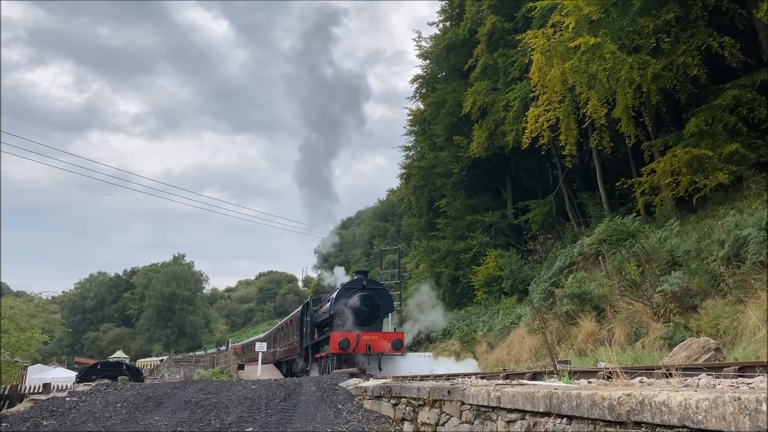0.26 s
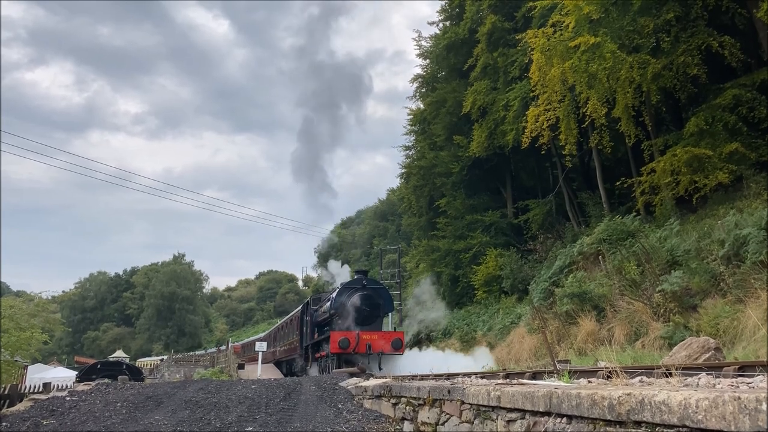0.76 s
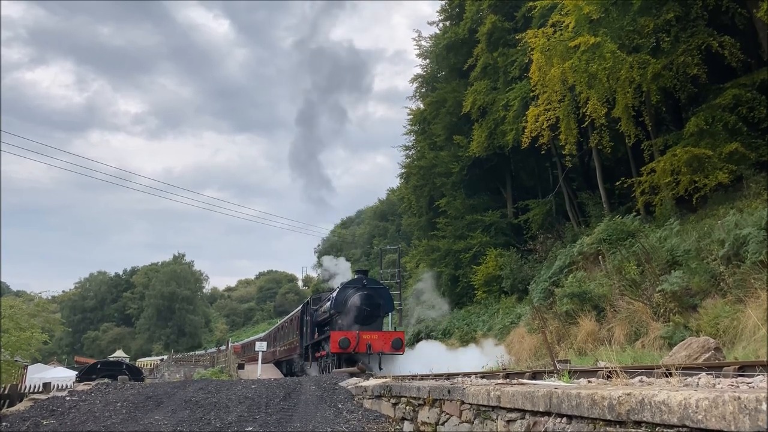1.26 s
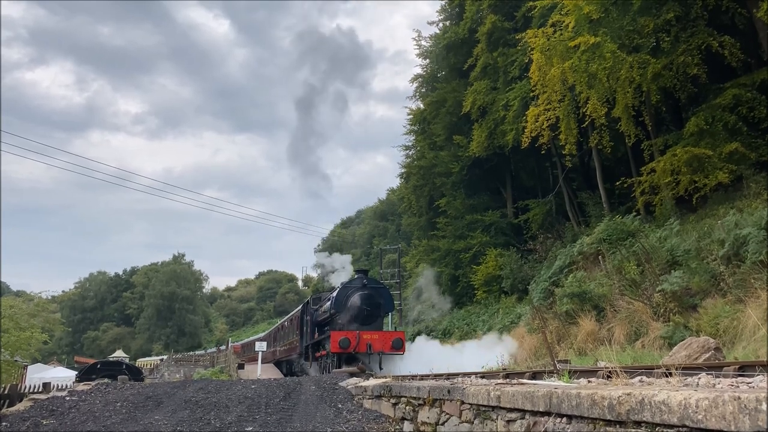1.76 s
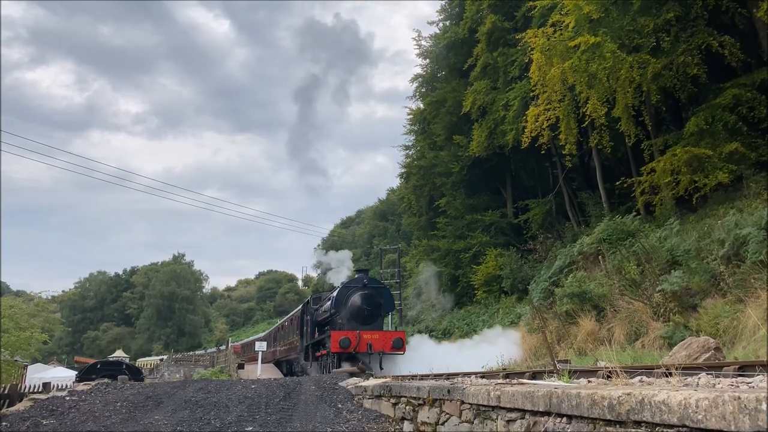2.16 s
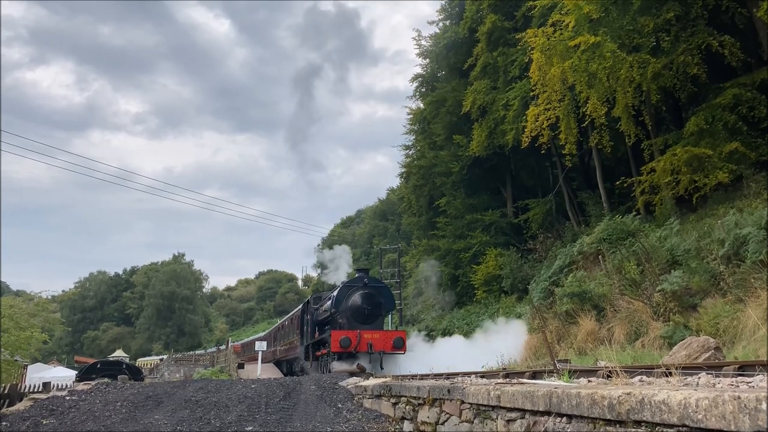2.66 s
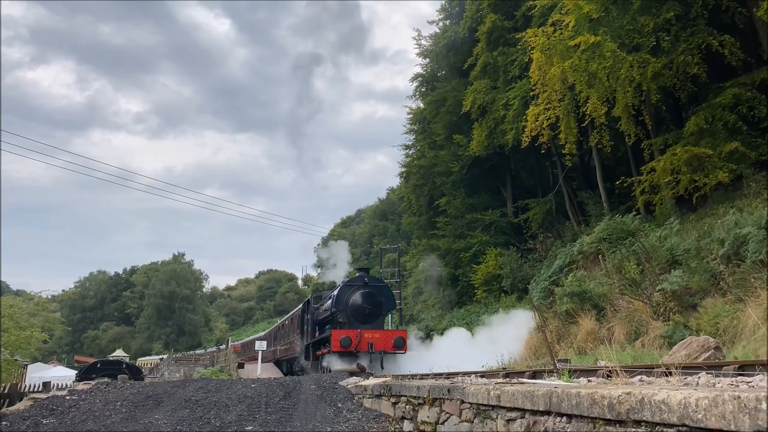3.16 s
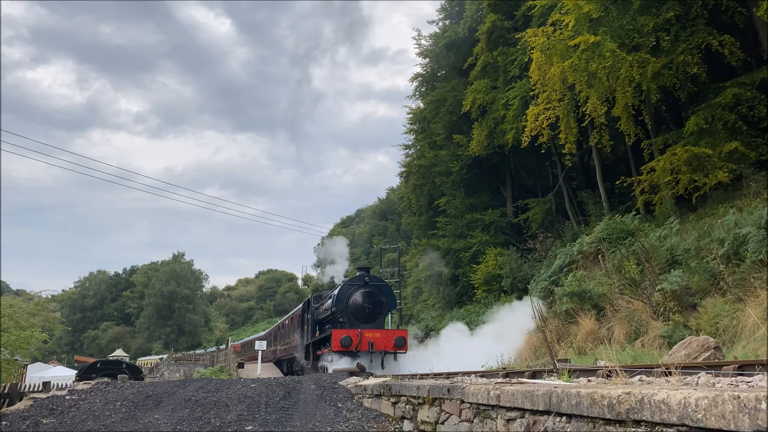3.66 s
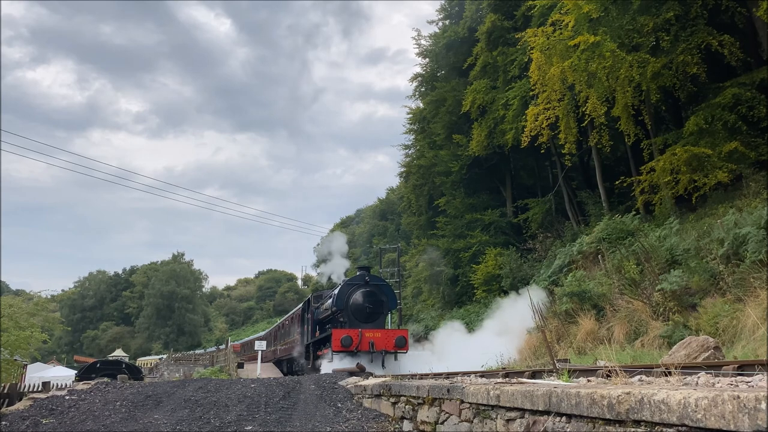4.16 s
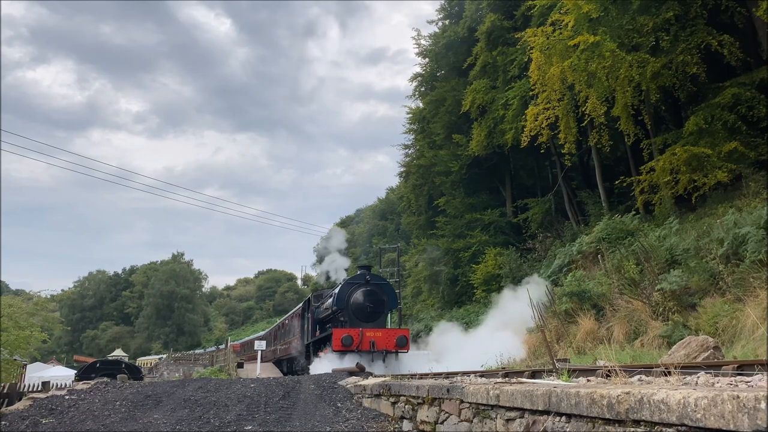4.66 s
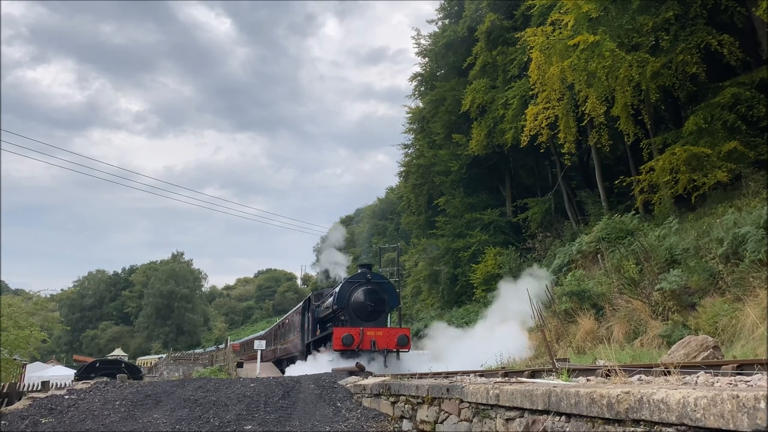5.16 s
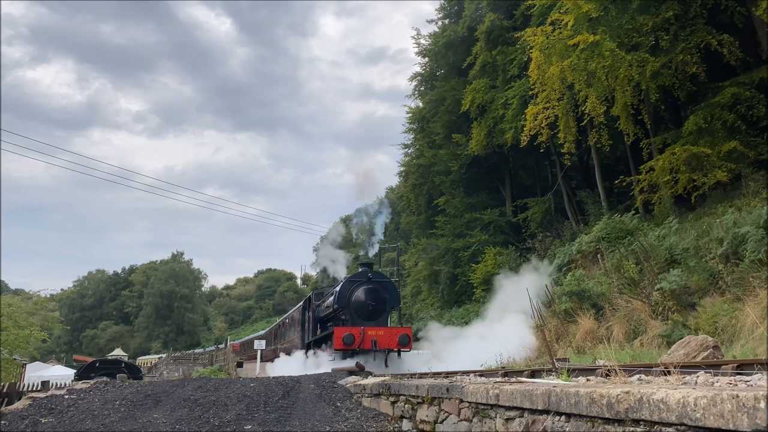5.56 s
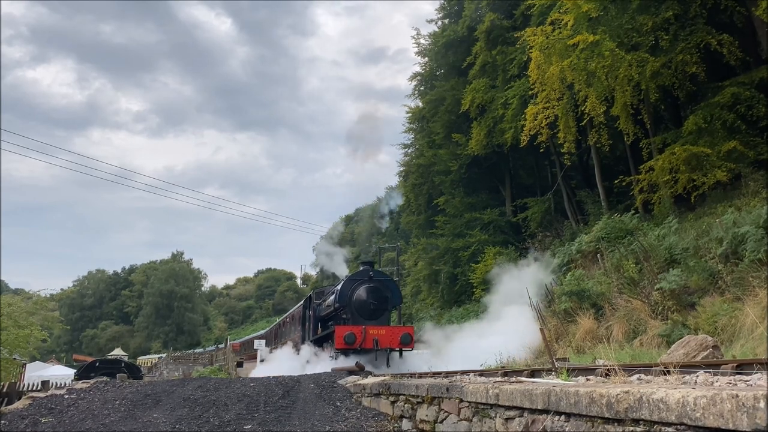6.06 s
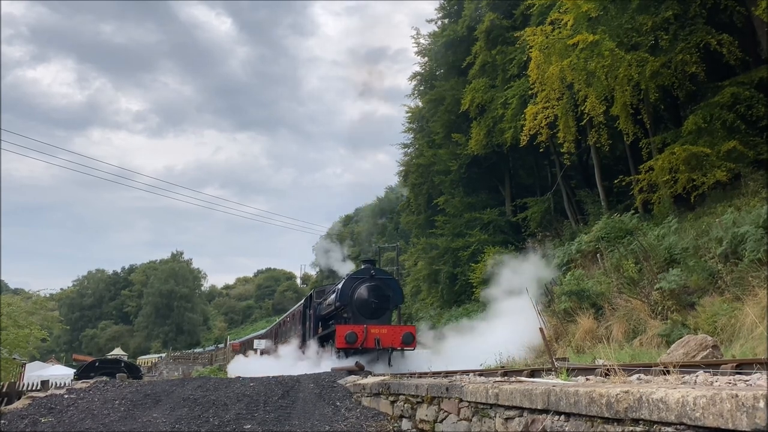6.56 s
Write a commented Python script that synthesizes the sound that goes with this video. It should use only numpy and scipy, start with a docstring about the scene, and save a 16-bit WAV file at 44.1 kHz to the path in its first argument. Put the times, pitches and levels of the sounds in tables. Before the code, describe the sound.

A steam locomotive hisses loudly from its cylinder cocks, the jet sinking and swelling again, with a soft exhaust thump over a low chimney rumble.

```python
"""Station in a wooded valley: a steam locomotive creeps out with its cylinder drain cocks open.
Steam jets (coloured noise) hiss loudly, sink and swell again.
A hollow note near 1 kHz (noise through narrow modes) sings in the steam, with thin strands and whistles.
The chimney rumbles and hums underneath and gives one soft exhaust beat of noise puffs and a sagging thud.
Heard in wide, uneven stereo."""
import sys
import numpy as np
from scipy import signal
from scipy.fft import irfft
from scipy.io import wavfile
from scipy.ndimage import uniform_filter1d

SR = 44100
rng = np.random.default_rng(int(sys.argv[2]) if len(sys.argv) > 2 else 0)


def transcribe(signal):
    """Save signal, clipped to [-1, 1], as a 16-bit WAV file at the path in sys.argv[1]."""
    frames = np.atleast_2d(signal).T
    limited = np.clip(frames, -1, 1)
    pcm = np.round(limited * 32767).astype(np.int16)
    wavfile.write(sys.argv[1], SR, pcm)


N = 300762
FRAME, HOP = 1024, 256  # samples
HZ = np.fft.rfftfreq(FRAME, 1 / SR)
FINE_HZ = np.fft.rfftfreq(N, 1 / SR)
TIMES = np.arange(N // HOP + 5) * HOP / SR  # s, one per frame
T = np.arange(N) / SR  # s, one per sample

# steam flow through the drain cocks, as a relative hiss level: t/s, level/dB
FLOW = [(0.0, -22.5), (0.1, -22.5), (0.23, -24), (0.34, -23), (0.82, -25), (1.39, -26.5), (1.85, -31),
        (1.99, -30.5), (2.55, -35.5), (2.72, -34.5), (3.15, -33), (3.87, -32), (4.2, -29.5), (4.69, -26),
        (4.9, -23.5), (5.14, -24.5), (5.35, -26.5), (5.6, -25), (5.8, -28), (5.95, -28), (6.15, -32),
        (6.55, -34.5), (6.73, -33), (6.82, -33)]


def drain_cocks(level_db=4.5, patchy_db=0.77, flutter_db=0.35, spit_db=0.9, churn_db=2.0, ripple_db=1.65):
    """Jets of steam: a roaring plume, a hissing core and a fizz at the nozzles."""
    # jet spectrum: f/Hz, relative level/dB
    jet_colour = [(300, -8.5), (550, -10.5), (660, -5.5), (900, -6.5), (1500, -5), (2800, -1.13),
                  (4600, -.5), (6200, -1.16), (7300, -4.5), (8000, -7), (9200, -6), (12000, -7.5),
                  (14000, -5), (15500, -11.5)]
    roar_growth, fizz_growth = 0.46, 0.97  # dB per dB of flow
    hiss_db, = follow(FLOW, TIMES[:, None])
    roar_db, fizz_db = stroke_state(TIMES[:, None])
    # a weak jet is dull, a strong one bright: roar and fizz relative to the hiss
    roar_db = roar_db + (roar_growth - 1) * hiss_db
    fizz_db = fizz_db + (fizz_growth - 1) * hiss_db
    fizz_db = fizz_db + spit_db * patches(size=(14, 1))[:, :1]  # wet steam spits unevenly

    low_cut = FINE_HZ ** 2 / (FINE_HZ ** 2 + 130 ** 2)  # a jet has little bass
    steam = handed_over(gain_of(read(jet_colour, FINE_HZ)) * low_cut)

    # (Hz, share) points
    roar_share = read([(400, 1.55), (1500, 1.03), (2300, 1.05), (2900, 0.66), (4500, 0.34), (7000, 0.086)])
    fizz_share = read([(6500, 0.088), (9000, 0.28), (13500, 1.07)])
    churn_share = read([(250, 0.3), (450, 1), (900, .8), (2000, 0.69), (4000, 0.48), (7000, 0.11)])
    ripple_share = read([(500, 0.87), (2000, 0.93)])
    field_db = hiss_db + roar_share * (roar_db - roar_db.mean())
    field_db = field_db + fizz_share * (fizz_db - fizz_db.mean())
    # eddies make the jet flutter, in narrow patches and across wide bands
    field_db = field_db + patchy_db * patches(size=(4, 14)) + flutter_db * patches(size=(4, 300))
    # the plume's large eddies churn its low roar more coarsely
    field_db = field_db + churn_db * patches(size=(7, 3)) * churn_share
    # echoes off the ground and the frames ripple the spectrum, drifting as the engine moves
    field_db = field_db + ripple_db * patches(size=(16, 1)) * ripple_share

    z = signal.stft(steam, nperseg=FRAME, noverlap=FRAME - HOP)[2]
    z = z * gain_of(field_db[:z.shape[-1]].T)
    jets = signal.istft(z, nperseg=FRAME, noverlap=FRAME - HOP)[1][:, :N]
    flow_rms = np.sqrt(np.mean(gain_of(hiss_db) ** 2))
    return gain_of(level_db) * flow_rms * evened(jets)


def handed_over(colour):
    """The hiss passes gradually through three jet colours, each with its own resonances."""
    # jet resonances and hollows: f/Hz, width/Hz, first jet/dB, second jet/dB, third jet/dB
    jet_peaks = [(367, 120, 1, 0, 0), (560, 120, -0.5, 0.5, -0.5), (1170, 55, -0.5, 3.5, -0.5),
                 (1370, 130, 1.5, 2.5, -1.5), (1550, 99, 0, -1.5, -0.5), (1748, 120, 4, 3.5, 1),
                 (2000, 130, 1, -2, 0), (2200, 220, 2, 2.5, 1), (2480, 150, 1.5, 1.5, 4),
                 (2630, 140, 0, -3, -1), (3070, 330, -1, 0, .5), (3470, 250, 1.5, 2.5, 3),
                 (3740, 160, -1.5, -1.5, -1.5), (4140, 140, 3.5, -0.5, 1), (4940, 550, 0, 1.5, 1.5),
                 (5560, 240, 2, 0, 0), (5900, 300, 0, 2, 1.5), (9200, 280, 0, 0.5, 2)]
    starts_s, length_s = [1.99, 4.52], 1.16
    hz, width_hz, *jets_db = np.transpose(jet_peaks)
    jets = []
    for db in jets_db:
        resonances = gain_of(peaks(zip(hz, width_hz, db)))
        jets.append(turbulence(colour * resonances * echo_ripple(depth_db=1.33, size=50)))
    steam, *later = jets
    for start_s, jet in zip(starts_s, later):
        share = np.clip((T - start_s) / length_s, 0, 1)
        steam = np.sqrt(1 - share) * steam + np.sqrt(share) * jet
    return steam


def stroke_state(t):
    """Each stroke sets the roar and fizz (dB) as its valve opens; then roar drifts and the steam dries."""
    # piston strokes, each uncovering a cock with fresh water in it, levels relative:
    # start/s, roar/dB, roar growth/(dB/s), fizz/dB, drying/(dB/s)
    strokes = [(-0.1, -0.93, 0, -0.2, 1.1), (2.75, 1, -0.2, 1, 0.27), (5.8, 0.2, 0.6, 4.5, 0.5)]
    valve_s = 0.25  # opening time
    state = None
    for start_s, roar_db, growth, fizz_db, drying in strokes:
        age_s = np.maximum(t - start_s, 0)
        fresh = np.array([roar_db + growth * age_s, fizz_db - drying * age_s])
        if state is None:
            state = fresh
        else:
            state = state + (fresh - state) * np.minimum(age_s / valve_s, 1)
    return state


def echo_ripple(depth_db, size):
    """Many late echoes off the wooded slope comb a spectrum finely."""
    return gain_of(depth_db * evened(uniform_filter1d(rng.standard_normal(len(FINE_HZ)), size)))


def pipe_note():
    """Rushing steam excites close pipe modes, a breathy note that swells and sinks, and steadier modes around."""
    # pipework modes of the note: f/Hz, width/Hz, relative level/dB
    pipe_modes = [(981.4, 21.5, -3.5), (1004, 25, -1), (1041, 30, -0.5), (1071, 32, -1)]
    # weaker breathy modes around the note: f/Hz, width/Hz, relative level/dB
    side_modes = [(680, 84, -11.5), (1330, 34, -6), (1327, 160, -12), (1736, 61, -6.5), (1834, 58, -5),
                  (2238, 95, -4), (2370, 87, -11.5)]
    # swells and lulls of the note: middle/s, half length/s (to 1/e), change/dB
    pipe_swells = [(.115, 0.04, 3), (.2, 0.039, -3), (1.52, 0.43, -4.5), (2.0, .05, 2), (2.14, .03, 3),
                   (2.454, 0.023, 6), (2.65, 0.083, -7), (3.02, 0.06, 2.5), (3.622, 0.051, 3.5),
                   (4.016, .06, 4), (4.2, 0.11, -8), (6.72, 0.072, -7)]
    level_db, fade_db_per_s, waver_db = -39.5, 0.45, 0.7
    side_db, side_fade_db_per_s, side_waver_db = -41, 0.2, 1
    swells_db = sum(db * np.exp(-((T - s) / half_s) ** 2) for s, half_s, db in pipe_swells)
    note_db = level_db - fade_db_per_s * T + swells_db + waver_db * drift(size=14)
    note = wavering(steadied(ringing(pipe_modes), size=3000), depth=0.00899)
    around_db = side_db - side_fade_db_per_s * T + side_waver_db * drift(size=12)
    around = wavering(ringing(side_modes), depth=0.00605)
    return gain_of(note_db) * note + gain_of(around_db) * around


def strands(waver_db=2):
    """Thin ringing strands (narrow noise) come and go in the hiss, stronger when much steam flows."""
    # strands: f/Hz, relative level/dB
    strand_modes = [(1858, -3), (2240, -5), (2369, -1.5), (2480, -1), (2880, -4), (4091, -8), (4620, 0.5),
                    (5972, -3), (6490, -6)]
    mean_db, width_hz, growth = -42.5, 10, 0.8  # growth: dB per dB of flow
    flow_db, = follow(FLOW, T)
    level_db = mean_db + growth * (flow_db - flow_db.mean()) + waver_db * drift(size=40)
    ring = ringing([(hz, width_hz, db) for hz, db in strand_modes])
    return gain_of(level_db) * wavering(ring, depth=0.00151)


def whistles(waver=0.0038):
    """Now and then a jet locks into a faint gliding tone: a sine of slightly unsteady pitch."""
    # whistles in jets and pipework: start/s, length/s, start f/Hz, end f/Hz, peak rms level/dB
    whistle_rows = [(0.065, 0.093, 1020, 1080, -41), (0.11, 0.058, 847, 834, -40.5),
                    (0.196, 0.105, 815, 708, -42), (0.288, 0.089, 6170, 6300, -30),
                    (0.37, 0.1, 2210, 2250, -36), (0.663, 0.055, 690, 666, -46.5),
                    (2.277, .075, 1020, 1068, -37.5), (2.339, 0.049, 1030, 973, -38),
                    (2.428, 0.049, 988, 1016, -37), (2.99, 0.055, 982, 1020, -42)]
    bend, late = 1.4, 1.7  # glide steepens; loudest about two thirds through
    out = np.zeros(N)
    for s, length_s, start_hz, end_hz, db in whistle_rows:
        u = np.clip((T - s) / length_s, 0, 1)
        jitter = evened(uniform_filter1d(rng.standard_normal(N), size=150))
        hz = (start_hz + (end_hz - start_hz) * u ** bend) * (1 + waver * jitter)
        envelope = np.sqrt(2 * abs(np.sin(np.pi * u ** late)))
        out += gain_of(db) * envelope * np.sin(2 * np.pi * np.cumsum(hz) / SR)
    return out


def exhaust():
    """A cylinder empties up the chimney: a growing breath, then merging soft puffs and a deep, sagging thud."""
    # exhaust puffs: peak/s, level/dB, rise/s, fall/s, top f/Hz
    beats = [(5.195, -31.5, 0.024, 0.042, 220), (5.282, -28, 0.028, 0.024, 340),
             (5.33, -38, 0.022, 0.07, 260)]
    # puff spectrum: f/Hz, relative level/dB
    beat_colour = [(20, -34), (55, -8), (100, 2), (160, -6), (245, 1), (330, -10.5), (600, -3)]
    # breath spectrum: f/Hz, relative level/dB
    rush_colour = [(120, -20), (300, 3), (420, -0.5), (750, 6.5), (1400, -8), (3000, -27)]
    rush_s, rush_db, rush_rise_s, rush_fall_s = 5.13, -41, 0.51, 0.1
    thud_s, thud_db, thud_rise_s, thud_fall_s = 5.33, -31, 0.02, 0.022
    thud_hz, sag_hz_per_s = 67.4, 565  # pitch at thud_s
    breath = turbulence(gain_of(read(rush_colour, FINE_HZ)))
    out = gain_of(rush_db) * swell(rush_s, rush_rise_s, rush_fall_s) * breath
    for s, db, rise_s, fall_s, top_hz in beats:
        colour = gain_of(read(beat_colour, FINE_HZ)) / (1 + (FINE_HZ / top_hz) ** 4)
        out = out + gain_of(db) * puff(s, rise_s, fall_s) * steadied(turbulence(colour), size=1000)
    hz = np.clip(thud_hz - sag_hz_per_s * (T - thud_s), thud_hz / 2, thud_hz * 2)
    thud = np.sin(2 * np.pi * (np.cumsum(hz) / SR + rng.random()))
    return out + gain_of(thud_db) * puff(thud_s, thud_rise_s, thud_fall_s) * thud


def chimney(lumpy_db=1.5):
    """The draught rumbles in the chimney, deeper as it grows, and makes it hum."""
    # rumble spectrum: f/Hz, relative level/dB
    rumble_colour = [(20, -30), (35, -23), (50, -7), (70, -0.5), (105, -1), (135, -4.5), (170, -4),
                     (275, -9), (350, -19), (600, -38), (1500, -70)]
    # hollow modes of chimney and smokebox: f/Hz, width/Hz, relative level/dB
    hum_modes = [(101, 11, -11), (214, 16, -3), (232.5, 16.5, -0.5), (257, 31, -9.5)]
    # draught: t/s, rumble level/dB, hum level/dB
    draught = [(0, -45, -51.5), (1.3, -48.5, -51), (1.6, -48.5, -54), (2.3, -51, -52), (2.7, -51, -47),
               (3, -46.5, -47.5), (3.42, -45, -42), (3.7, -43, -48.5), (5, -42.5, -46), (5.5, -43.5, -45),
               (6.0, -47, -50.5), (6.5, -44.5, -46), (6.82, -46, -46.5)]
    deep_mode = (50, 24, 0)  # f/Hz, width/Hz, relative level/dB
    deep_mean_db, deep_growth = -56, 1.2  # growth: dB per dB of rumble
    rumble_db, hum_db = follow(draught, T)
    rumble = gain_of(rumble_db) * turbulence(gain_of(read(rumble_colour, FINE_HZ)))
    deep_db = deep_mean_db + deep_growth * (rumble_db - rumble_db.mean()) + lumpy_db * drift(size=16)
    deep = gain_of(deep_db) * ringing([deep_mode])
    hum = gain_of(hum_db) * steadied(ringing(hum_modes), size=5000)
    return rumble + deep + hum


def turbulence(gain):
    """Steady noise of a given spectrum, spread over left and right; rms 1."""
    # left-right correlation: f/Hz, correlation (0-1)
    correlation = [(200, 0.94), (700, 0.045), (850, .25), (1030, 0.86), (1200, .38), (1350, 0.47),
                   (1580, 0.2), (1750, 0.43), (2000, 0.37), (2200, 0.64), (2700, 0.48), (3600, 0.62),
                   (4150, 0.22), (4550, 0.34), (5350, 0.26), (6300, 0.64), (7300, 0.12), (8300, 0.15),
                   (8900, 0.44), (11300, 0.42), (12500, 1), (15500, 0.74)]
    # left-right phase offset: f/Hz, phase/rad
    phase_offset = [(500, 0.0), (850, 1.67), (1230, -1.6), (1350, -1.7), (1500, -2.5), (1660, 0.66),
                    (1950, -0.5), (2450, 0.4), (3000, 2), (3950, 3), (4350, 1.0), (5150, 2), (5350, -2),
                    (5900, -2.1), (6400, 0), (7000, 1.8), (7400, 2), (7950, 5), (8800, 1), (9400, 1.5),
                    (10500, -0.5), (12000, -3.5), (14000, -5.5), (15600, -8.5)]
    # left-right balance: f/Hz, left minus right/dB
    balance = [(300, -0.5), (500, -0.3), (700, 2), (1000, 4.5), (1280, -1), (1600, -3), (1800, 1),
               (2000, -3.5), (2250, 0), (2420, -4), (2900, -3), (3500, -1.5), (4200, -0.5), (4950, 1.5),
               (5650, -2), (6650, 1), (7750, -1.5), (8400, 4), (9200, 0.2), (15000, -0.2)]
    a, b, c, d = rng.standard_normal((4, len(FINE_HZ)))
    same = np.clip(read(correlation, FINE_HZ), 0, .98)
    side_db = read(balance, FINE_HZ) / 2
    left = a + 1j * b
    right = same * left + np.sqrt(1 - same ** 2) * (c + 1j * d)
    right = right * np.exp(-1j * read(phase_offset, FINE_HZ))
    stereo = np.array([left * gain_of(side_db), right * gain_of(-side_db)])
    return evened(irfft(stereo * gain, N))


def ringing(modes):
    """Noise through narrow modes (Hz, full width Hz at half amplitude, dB)."""
    return turbulence(sum(gain_of(db) / (1 + (2 * (FINE_HZ - hz) / width) ** 4) for hz, width, db in modes))


def peaks(rows):
    """Resonances (Hz, width Hz, dB) as bumps on a dB spectrum."""
    return sum(db * np.exp(-2 * ((FINE_HZ - hz) / width) ** 2) for hz, width, db in rows)


def wavering(sound, depth):
    """Lets the pitch of a sound wander by a small share (rms depth), by uneven reading speed."""
    speed = depth * drift(size=30)
    at = T + np.cumsum(speed - speed.mean()) / SR
    return np.array([np.interp(at % T[-1], T, channel) for channel in sound])


def steadied(sound, size):
    """Holds the strength of a noise even over a number of samples."""
    return sound / np.sqrt(abs(uniform_filter1d((sound ** 2).mean(0), size)) + 1e-9)


def swell(s, rise, fall):
    """An envelope that grows exponentially to a peak at s and dies away."""
    return np.exp(-np.maximum((s - T) / rise, (T - s) / fall) / 2)


def puff(s, rise, fall):
    """A round-topped (Gaussian) envelope around s, with short skirts."""
    return np.exp(-np.maximum((s - T) / rise, (T - s) / fall) ** 2 / 2)


def drift(size):
    """Slow chance of spread 1, smoothed over a number of frames."""
    return np.interp(T, TIMES, evened(uniform_filter1d(rng.standard_normal(len(TIMES)), size)))


def patches(size):
    """Smooth chance of spread 1 in patches of (frames, bins)."""
    z = rng.standard_normal((len(TIMES), len(HZ)))
    z = uniform_filter1d(z, size[0], axis=0)
    return evened(uniform_filter1d(z, size[1], axis=1))


def gain_of(db):
    """Amplitude factor of a level in dB."""
    return 10 ** (np.asarray(db) / 20)


def evened(x):
    """Scales to rms 1."""
    return x / np.sqrt(np.mean(x ** 2) + 1e-20)


def read(points, hz=HZ):
    """Joins (Hz, value) points on a log-frequency axis."""
    f, value = np.transpose(points)
    return np.interp(np.log(hz + 1), np.log(f + 1), value)


def follow(rows, t):
    """The columns of a curve table at the times t."""
    s, *columns = np.transpose(rows)
    return [np.interp(t, s, c) for c in columns]


def scene():
    """Sums the jets, their tones and the chimney."""
    return drain_cocks() + pipe_note() + strands() + whistles() + exhaust() + chimney()


def record(dry):
    """Band limit: a linear-phase low-pass."""
    edge_hz = 15700
    low_pass = signal.firwin(511, edge_hz, window=("kaiser", 9), fs=SR)
    return signal.oaconvolve(dry, low_pass[None], "same")


dry = scene()
out = record(dry)
transcribe(out)
```